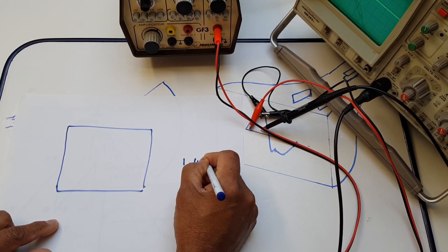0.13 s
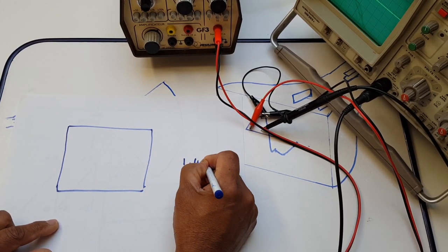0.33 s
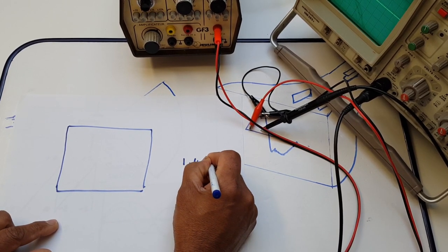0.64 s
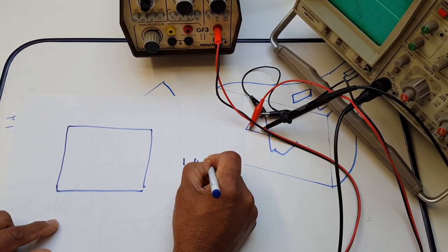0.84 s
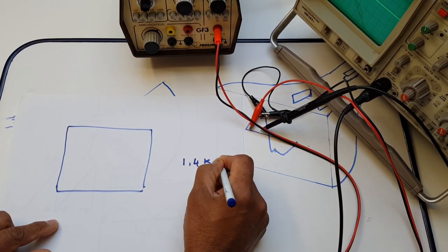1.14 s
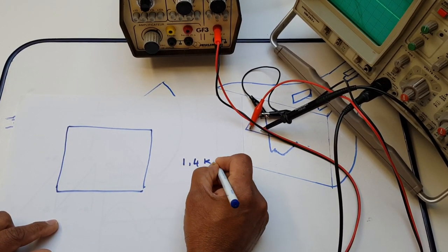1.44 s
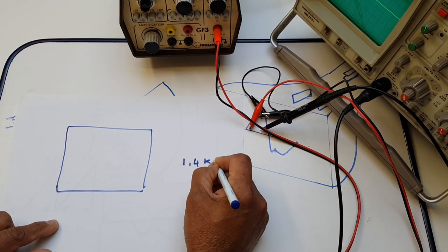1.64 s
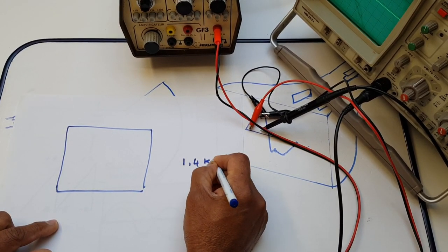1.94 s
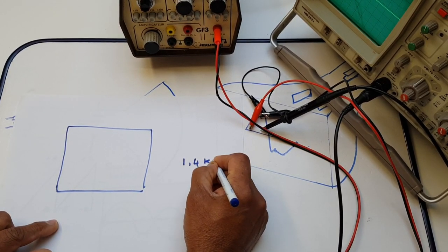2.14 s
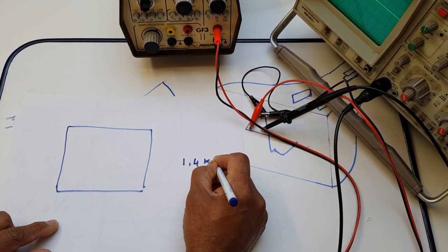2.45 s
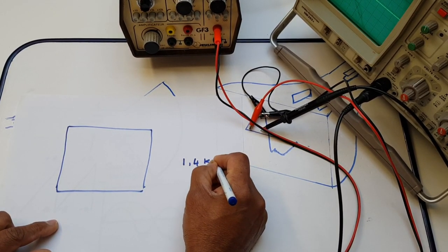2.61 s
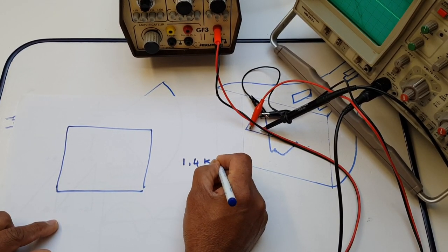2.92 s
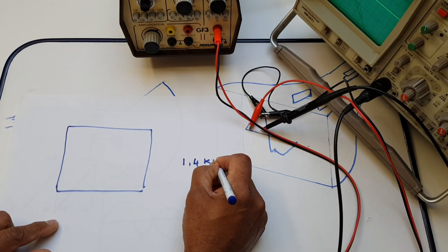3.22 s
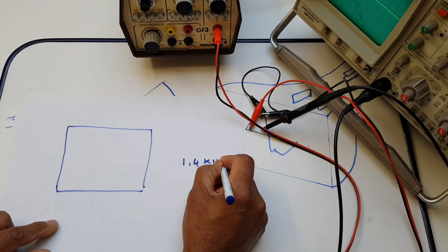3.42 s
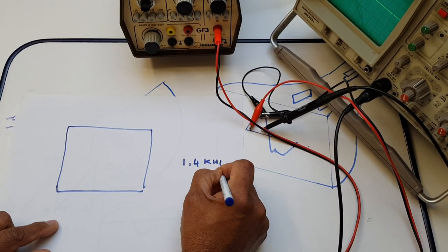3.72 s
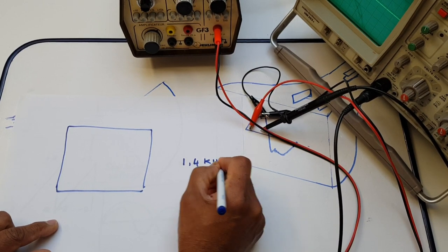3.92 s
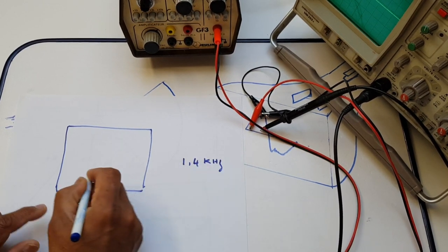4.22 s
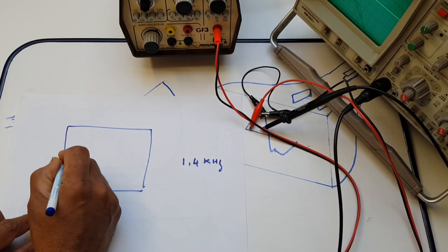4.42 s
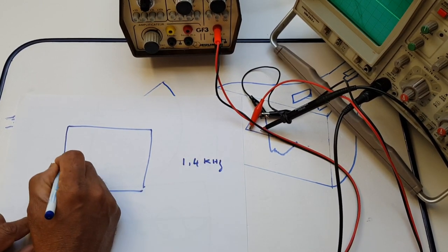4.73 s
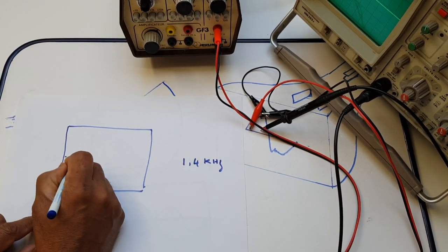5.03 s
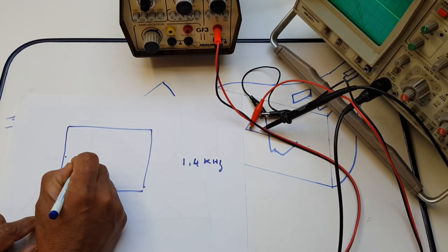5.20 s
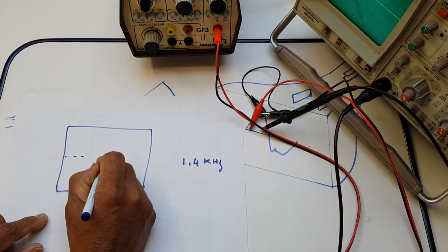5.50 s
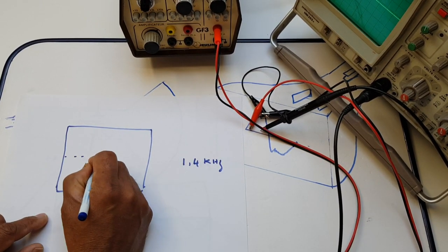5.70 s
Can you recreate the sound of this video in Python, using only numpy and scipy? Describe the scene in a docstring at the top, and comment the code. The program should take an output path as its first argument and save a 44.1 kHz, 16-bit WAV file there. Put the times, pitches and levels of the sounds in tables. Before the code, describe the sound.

Close, quiet pen strokes and tiny nib clicks, a sharp desk knock midway, then paper taps, brief squeak and swishes above mains hum.

```python
"""A small room: a felt marker writes short strokes on a sheet of paper lying on a desk, heard close up.
The rubs are random fibre snaps shaped by spectra and resonances; the nib ticks down as noise clicks.
The hand slides, presses, squeaks and bumps the desk once with rebounds; taps and knocks are damped modes.
Mains hum, low rumble and thin hiss lie behind and grow louder after the first second.
Levels in the tables are relative: each layer trims them further as it is mixed."""
import sys
import numpy as np
from scipy import signal
from scipy.fft import rfft, irfft, next_fast_len
from scipy.io import wavfile
from scipy.ndimage import uniform_filter1d, map_coordinates

SR = 44100
rng = np.random.default_rng(int(sys.argv[2]) if len(sys.argv) > 2 else 0)


def int16_out(signal):
    """Quantize to a 16-bit WAV file."""
    q = np.round(np.clip(np.atleast_2d(signal).T, -1, 1) * 32767)
    wavfile.write(sys.argv[1], SR, q.astype(np.int16))


N = 258205


def amp(db):
    """Decibels to gain."""
    return 10 ** (np.asarray(db) / 20)


def unit(x):
    """Scale to rms 1."""
    return x / np.sqrt(np.mean(x ** 2) + 1e-20)


def along(points, hz):
    """Read (Hz, value) points on a log frequency axis."""
    f, v = np.transpose(points)
    return np.interp(np.log(hz + 1), np.log(f + 1), v)


def curves(rows):
    """One value per sample for each column after the time."""
    s, *cols = np.transpose(rows)
    return [np.interp(np.arange(N) / SR, s, c) for c in cols]


def wobble(rate):
    """A smooth random curve with rate knots a second."""
    knots = rng.standard_normal(int(N * rate / SR) + 4)
    return map_coordinates(knots, [np.arange(N) * rate / SR])


def filtered(x, response):
    """x times a response of frequency, padded so that the end does not wrap to the start."""
    n = x.shape[-1]
    m = next_fast_len(n + 8192)
    return irfft(rfft(x, m) * response(np.fft.rfftfreq(m, 1 / SR)), m)[..., :n]


def coloured(x, spectrum):
    """x shaped by (Hz, dB) points, at rms 1."""
    return unit(filtered(x, lambda hz: amp(along(spectrum, hz))))


def resonant(x, modes):
    """x through parallel (Hz, width Hz, dB) resonances of alternating sign, at rms 1."""
    def response(f):
        total = 0
        for k, (centre, width, db) in enumerate(modes):
            damping = 1j * f * width
            total = total + (-1) ** k * amp(db) * damping / (centre * centre - f * f + damping)
        return total
    return unit(filtered(x, response))


def ring(modes, t, attack):
    """Damped (Hz, dB, t60 s) modes at slightly new strengths, with a softened onset."""
    total = np.zeros(len(t))
    for hz, db, t60 in modes:
        decay = amp(db + rng.normal(0, 1) - 60 * t / t60)
        total += decay * np.sin(2 * np.pi * hz * t)
    return total * (1 - np.exp(-t / attack))


def stereo(pair, alike):
    """Blend two unrelated signals into left and right of the given (Hz, likeness)."""
    def mid_side_gains(hz):
        turn = np.arccos(np.clip(along(alike, hz), -1, 1)) / 2
        return np.array([np.cos(turn), np.sin(turn)])
    mid, side = filtered(pair, mid_side_gains)
    return np.array([mid + side, mid - side])


def panned(x, left_db):
    """Lean a sound to the left."""
    return x * amp([[left_db / 2], [-left_db / 2]])


def add(track, s, sound):
    """Mix a sound in at time s."""
    part = track[..., round(s * SR):][..., :sound.shape[-1]]
    part += sound[..., :part.shape[-1]]


def background():
    """Mains and motor hum over a low rumble, with a smooth thin hiss, each noise a shaped spectrum."""
    # slow level of the room: time_s, rumble_and_hum_db, hiss_db
    room_levels = [(0, -62, -83.5), (1.2, -60, -84), (1.65, -54, -80.5), (2.15, -50.5, -76), (3, -50, -75),
                   (5.85, -50.5, -75)]
    # hum lines: pitch_hz, level_db (against the rumble curve)
    hum_lines = [(61.6, -5), (100, -2.5), (183, -24), (200, -31), (248, -34.5), (314, -32.5)]
    # noise spectra: frequency_hz, density_db
    rumble_spectrum = [(15, -23), (27, -30.5), (40, -10), (52, -1), (62, 1), (80, 0.5), (105, -9.5),
                       (140, -19.5), (180, -19.5), (240, -24), (340, -34.5), (500, -57.5), (900, -60.5)]
    hiss_spectrum = [(240, -14), (450, 1.5), (900, -6), (2000, -6), (3500, -7.5), (4600, -8), (4950, -1.5),
                     (5700, -12), (7100, -25.5), (8200, -18.5), (9300, -17.5), (10500, -7.5), (11800, -2.5),
                     (15500, -1.5)]
    # stereo image: frequency_hz, left-right likeness (0 to 1)
    room_alike = [(60, 1), (130, 0.5), (290, 0.58), (640, 0.2), (1400, 0), (15000, 0)]
    # stereo lean: frequency_hz, left_minus_right_db
    room_balance = [(60, 0), (100, -2.5), (140, -1), (700, 1), (1500, 0.5), (3400, 5.5), (4500, 9.5),
                    (5000, 9), (6000, 7.5), (7100, -3), (8300, 6.5), (10000, 3), (12000, 1)]

    rumble_db, hiss_db = curves(room_levels)
    t = np.arange(N) / SR
    hum = np.zeros(N)
    for hz, db in hum_lines:
        drift = 0.35 * wobble(3.0)  # radians
        hum += amp(db) * np.sqrt(2) * np.sin(2 * np.pi * (hz * t + rng.random()) + drift)
    air = stereo(rng.standard_normal((2, N)), room_alike)
    low = amp(rumble_db) * (amp(-0.5) * coloured(air, rumble_spectrum) + hum)
    hiss = amp(hiss_db + 5.5) * coloured(air, hiss_spectrum)
    sides = np.array([[.5], [-.5]])
    return filtered(low + hiss, lambda hz: amp(sides * along(room_balance, hz)))


def room(x):
    """The walls answer each side with its own short tail of decaying noise."""
    # wall reverberation: frequency_hz, t60_s
    walls = [(150, 0.18), (1000, 0.2), (4000, 0.26), (12000, 0.25)]
    hz, t, z = signal.stft(rng.standard_normal((2, SR // 2)), SR, nperseg=256)
    decay = amp(-60 * t / along(walls, hz)[:, None])
    tail = signal.istft(z * decay, SR, nperseg=256)[1]
    tail = tail * np.clip(np.arange(tail.shape[1]) / SR / 0.011, 0, 1)  # fades in over 11 ms
    return signal.fftconvolve(x, tail / np.linalg.norm(tail[0]), axes=1)[:, :N]


def nearby(x, count=6):
    """Instruments around the desk throw back early copies whose strength and sign drift at random."""
    out = x.copy()
    for side in range(2):
        for delay_s in rng.uniform(.0015, .012, count):
            add(out[side], delay_s, amp(-12.0) * wobble(1.53) * x[side])
    return out


def gestures(rows, release_db_per_s, dulling_db_per_s=0):
    """Gains of a rub's main and second band: each gathers speed smoothly, holds it, then dies away."""
    power = np.zeros((2, N))
    t = np.arange(SR) / SR
    for s, attack, hold, db, second_db in rows:
        speed = np.sin(np.pi / 2 * np.clip(t / attack, 0, 1)) ** 2
        main_db = db - release_db_per_s * np.maximum(t - attack - hold, 0)
        tilt_db = second_db - dulling_db_per_s * (t - attack)
        add(power, s, (speed * amp([main_db, main_db + tilt_db])) ** 2)
    return np.sqrt(power)


def friction(per_second, smooth, judder_db):
    """Paper fibres catch and let go: tiny random snaps over a smooth rub, in an uneven grip."""
    # stereo image of the rubbing: frequency_hz, left-right likeness (0 to 1)
    rub_alike = [(500, 0.7), (1500, 0.43), (4000, 0.12), (9000, 0.024)]
    caught = rng.random(N) < per_second / SR
    snaps = unit(caught * rng.standard_normal((2, N)))
    rub = snaps + smooth * rng.standard_normal((2, N))
    return stereo(rub * amp(judder_db * wobble(160)), rub_alike)


def press():
    """The holding hand creeps on the left: the sheet rasps and the desk groans under it."""
    # presses of the other hand: start_s, attack_s, hold_s, rub_db, groan_db (against the rub)
    presses = [(4.548, 0.018, 0.28, -66, 0.5), (5.375, 0.029, 0.22, -69.5, 0)]
    # resonances of the pressed sheet: pitch_hz, width_hz, level_db
    pressed_sheet = [(2280, 130, -2), (3800, 270, -2), (4180, 370, 0), (4850, 510, -3.5), (8200, 560, -4.5),
                     (11100, 870, -7.5)]
    groan_spectrum = [(150, -0.5), (280, 4.0), (400, -7.5), (550, -11), (720, -20), (950, -25.5)]

    rub, groan = gestures(presses, release_db_per_s=98)
    rasp = resonant(friction(per_second=2300, smooth=0.91, judder_db=-0.5), pressed_sheet)
    low = coloured(friction(per_second=1300, smooth=1.5, judder_db=-0.3), groan_spectrum)
    swell = uniform_filter1d(groan, SR // 16)  # the heavy desk follows the hand slowly
    return panned(amp(-3.5) * rub * rasp, left_db=10) + panned(amp(2.0) * swell * low, left_db=8.0)


def squeaks():
    """Skin sticks and slips on the sheet and sings briefly at an unsteady pitch, with an octave above."""
    # squeaks: start_s, length_s, pitch_hz, level_db, octave_db (against the fundamental)
    squeak_rows = [(4.553, 0.017, 1920, -55.5, -27), (4.795, .016, 2530, -68, -20),
                   (4.957, 0.023, 1680, -74.5, -20), (5.107, 0.06, 1710, -72.5, -3),
                   (5.277, 0.065, 1650, -78, -8)]
    out = np.zeros(N)
    for s, length, hz, db, octave_db in squeak_rows:
        size = round(length * SR)
        pitch = hz * (1 + .035 * wobble(346)[:size])
        phase = 2 * np.pi * np.cumsum(pitch) / SR
        grip = np.sin(np.pi * np.arange(size) / size) * amp(4.6 * wobble(126)[:size])
        add(out, s, amp(db) * grip * (np.sin(phase) + amp(octave_db) * np.sin(2 * phase)))
    return panned(out, left_db=4)


def bump():
    """The hand bumps the desk and rebounds: hollow knocks with a short crack over a deep thud."""
    # blows: start_s, knock_db, thud_db
    bumps = [(3.8491, -29.5, -42), (3.8617, -34, -33), (3.8743, -48, -55), (3.8869, -50, -42)]
    # modes of the desk's knock, then of its deep thud: pitch_hz, level_db, t60_s
    desk_modes = [(596, -40, 0.027), (770, -3, 0.022), (955, -22.5, .1), (1274, -20, 0.038),
                  (1550, -17, 0.013), (1880, -33, .016), (2400, -17, 0.013)]
    thud_modes = [(74.4, -11, 0.13), (123, 5, 0.059), (200, -5, 0.065)]
    crack_spectrum = [(300, -7), (1500, 37), (3500, 24), (12000, -7)]

    out, t = np.zeros((2, N)), np.arange(SR // 3) / SR
    for s, knock_db, thud_db in bumps:
        crack = coloured(rng.standard_normal((2, len(t))), crack_spectrum) * amp(-60 * t / 0.007)
        knock = amp(knock_db) * (ring(desk_modes, t, attack=0.00075) + 0.18 * crack)
        thud = amp(thud_db + 2.5) * ring(thud_modes, t, attack=0.0031)
        add(out, s, panned(knock, left_db=7.5) + panned(thud, left_db=5.5))
    return out


def taps():
    """A fingertip slaps the sheet, which rings hollow and rattles briefly against the desk."""
    # taps: start_s, level_db, low_knock_db (against the tap), pitch factor, t60_s
    tap_rows = [(4.031, -59, -7, .85, 0.078), (4.5017, -40.5, -11.5, 0.97, 0.067),
                (4.512, -48.5, -5, 0.6, 0.26), (4.557, -47.5, -16, 0.92, 0.1), (4.573, -54, 1, 0.94, 0.12),
                (4.963, -67.5, -3, 1.14, .08), (5.1, -60, -6, 0.87, 0.17), (5.125, -62, 7.5, 0.88, .2),
                (5.287, -58, -1, 0.88, 0.18), (5.302, -59.5, -1, 0.7, 0.12)]
    # modes of the sheet under a fingertip: pitch_hz (before the factor), level_db, share of the tap's t60
    sheet_modes = [(884, -4.5, 0.94), (1052, -28, 0.8), (1170, -20, 0.42), (1500, -4, 0.42),
                   (1620, -2, 0.99), (1781, 4, 0.81), (1900, -13, .7), (2450, -11, 0.42), (2750, -2, 0.34),
                   (3110, -9, .5), (3700, -22, 0.83), (3980, -25, .7), (5130, -16, .4), (6800, -7.5, .5)]
    paper_spectrum = [(500, -16.0), (1000, 5.0), (1800, 5.5), (2800, -4.0),
                      (4000, -19), (7000, -14), (14000, -40.0)]
    knock_spectrum = [(150, 7.0), (350, -5.5), (650, -5.5), (1200, -30)]

    out, t = np.zeros((2, N)), np.arange(SR // 4) / SR
    for s, db, low_db, pitch, t60 in tap_rows:
        modes = [(hz * pitch, level, share * t60) for hz, level, share in sheet_modes]
        tone = np.array([ring(modes, t, attack=0.00047) for side in range(2)])
        rattle = rng.standard_normal((2, len(t))) * amp(-60 * t / t60) * (1 - np.exp(-t / 0.00063))
        paper = coloured(rattle, paper_spectrum)
        knock = coloured(rattle, knock_spectrum)
        add(out, s, amp(db - 14.0) * tone + amp(db - 26.5) * paper + amp(db + low_db - 16.0) * knock)
    return panned(out, left_db=1.5)


def hand():
    """Skin slides over paper with a soft swish and a lower band for the hand's weight."""
    # slides: start_s, attack_s, hold_s, swish_db, weight_db (against the swish)
    slides = [ (0.04, 0.021, 0.014, -79, -1.5), (0.472, 0.021, .012, -79, 6.5),
              (0.772, 0.022, 0.0077, -67, -2), (1.003, 0.06, 0.066, -71, -1),
              (1.085, 0.06, 0.043, -67.5, 2.5), (1.245, 0.043, 0.029, -75, 2.5),
              (2.872, 0.036, 0.012, -71, 2), (3.238, 0.023, 0.0061, -68, 5), (3.33, 0.018, 0.011, -72.5, 6),
              (3.64, 0.037, 0.082, -61, 6.5), (3.852, 0.046, 0.008, -61, 5),
              (3.982, 0.0067, 0.0037, -62.5, 3), (4.13, 0.039, 0.017, -70.5, -1),
              (4.533, 0.039, 0.014, -61.5, 0.5), (4.635, .06, 0.099, -67, -4),
              (4.925, 0.064, 0.074, -68.5, 1), (5.10, 0.096, 0.037, -69.5, 1),
              (5.28, 0.13, 0.055, -64, -1.5), (5.385, 0.058, 0.013, -54, -2.5),
              (5.485, 0.035, .022, -57, -1.5), (5.592, 0.013, 0.015, -64, -1), ]
    # spectra of the airy swish and of the weighted palm: frequency_hz, density_db
    swish_spectrum = [(3000, -64), (5500, -9), (7000, -1), (8300, 2.5), (9300, -1), (10500, 1), (12500, -2),
                      (15500, -8.5)]
    palm_spectrum = [(200, -29), (400, -15), (850, -41), (1250, -14), (1750, -6), (2400, -6), (3100, -2.5),
                     (4000, -0.5), (4800, -2), (6000, -14), (9000, -31)]

    swish, weight = gestures(slides, release_db_per_s=200)
    drag = friction(per_second=8100, smooth=1.15, judder_db=0.8)
    palm = amp(-7.0) * weight * coloured(drag, palm_spectrum)
    return amp(-1.0) * swish * coloured(drag, swish_spectrum) + panned(palm, left_db=3.0)


def ticks():
    """The nib lands with a tiny dry click and a faint rustle of the sheet, both decaying noise."""
    # touchdowns: start_s, level_db
    tick_rows = [(2.2883, -52), (2.579, -60.5), (2.6767, -51.5), (3.5318, -43.5), (4.1847, -48.5)]
    # spectrum of the click: frequency_hz, density_db
    tick_spectrum = [(600, -13), (2000, -15), (3500, 6.5), (5500, -2), (7500, 1), (9200, -8), (11000, -33),
                     (15000, -30)]
    out, t = np.zeros((2, N)), np.arange(SR // 10) / SR
    click = amp(-60 * t / .012)
    rustle = amp(-17) * amp(-60 * t / .16)
    for s, db in tick_rows:
        noise = coloured(rng.standard_normal((2, len(t))), tick_spectrum)
        add(out, s, amp(db - 5.0) * (click + rustle) * noise)
    return out


def marker():
    """The felt nib scratches and rings the barrel, with a second band of bright fibre noise."""
    # strokes: start_s, attack_s, hold_s, scratch_db, brightness_db (against the scratch)
    strokes = [ (0.337, 0.059, 0.011, -61.5, -13.5), (0.786, 0.036, 0.0051, -62.5, -3.5),
               (0.873, 0.016, 0.053, -60.5, -12), (1.11, 0.041, 0.057, -75, -2),
               (2.716, .054, 0.031, -58, -11.5), (3.054, 0.045, 0.024, -58.5, -6.5),
               (3.286, 0.025, 0.013, -65.5, -3.5), (3.462, 0.027, 0.018, -69, -15),
               (3.525, 0.036, 0.077, -57, -6.5), (3.63, 0.024, 0.054, -64.5, 1),
               (3.735, 0.065, .03, -62, -15), (3.797, 0.021, .026, -48, -3.5),
               (4.174, 0.016, 0.0085, -55, -18), (5.512, 0.028, 0.02, -61, -19), ]
    # resonances of the barrel and the paper under the nib: pitch_hz, width_hz, level_db
    nib_modes = [(1420, 320, -10.5), (1625, 92, -5.5), (1842, 63, -5), (2076, 84, -6), (2520, 146, -4.5),
                 (2844, 59, -0.5), (3440, 61, -12), (3646, 135, -3), (3860, 110, 1.5), (4220, 89, 1),
                 (4380, 250, -4), (4640, 91, -1), (5530, 73, -20), (7100, 65, -28)]
    # spectra of the scratch and of the bright fibres: frequency_hz, density_db
    scratch_spectrum = [(350, -16), (600, -9.5), (980, -15), (1430, 3), (1800, -2.5), (2250, -10.5),
                        (2600, -9.5), (3100, -2.5), (3900, -1.5), (4600, -3.5), (5300, -8), (7000, -15),
                        (10000, -45)]
    fibre_spectrum = [(3000, -24), (5500, -4), (6500, 0), (8000, 3), (10000, -1.5), (13000, -2.5),
                      (15500, -11)]

    # a stroke dies away as the nib slows and lifts, and loses brightness as it goes
    scratch, bright = gestures(strokes, release_db_per_s=340, dulling_db_per_s=51)
    drag = friction(per_second=6500, smooth=1.0, judder_db=0.3)
    barrel = resonant(friction(per_second=2500, smooth=0.59, judder_db=1.1), nib_modes)
    barrel = coloured(barrel, [(600, -28), (1300, 6), (8000, -4.5), (12000, -24)])
    body = unit(amp(1.0) * coloured(drag, scratch_spectrum) + panned(barrel, left_db=5))
    fibres = amp(1.5) * bright * coloured(drag, fibre_spectrum)
    return amp(-1.0) * scratch * body + panned(fibres, left_db=-2.5)


def scene():
    """Rubs and blows on the desk, the early copies of the rubs, the room's tail and its background."""
    rubs = nearby(marker() + hand() + press())
    blows = ticks() + taps() + squeaks() + bump()
    return rubs + blows + room(amp(-20.5) * rubs + amp(-2.5) * blows) + background()


def record(dry):
    """A steep band limit keeps only what lies below the top frequency."""
    top_hz = 15750
    return filtered(dry, lambda hz: hz < top_hz)


dry = scene()
out = record(dry)
int16_out(out)
```